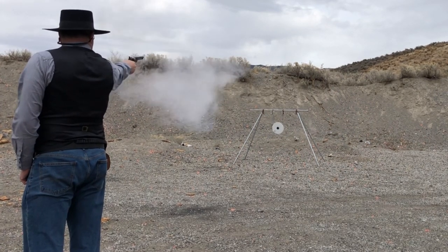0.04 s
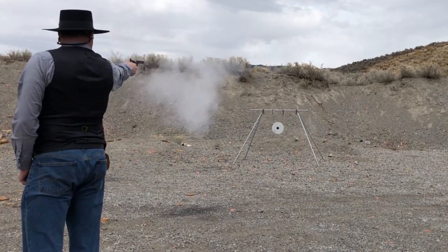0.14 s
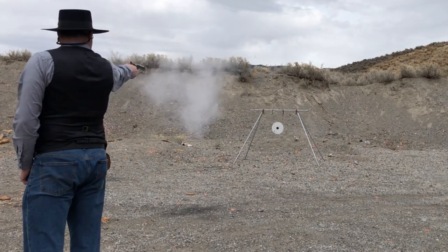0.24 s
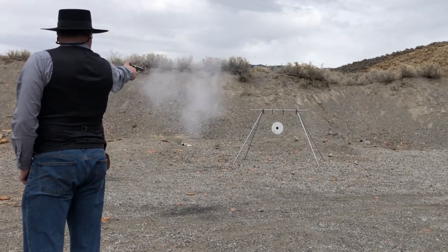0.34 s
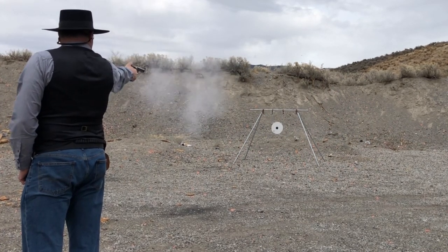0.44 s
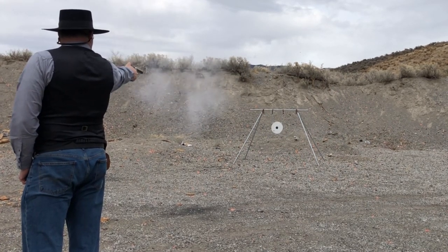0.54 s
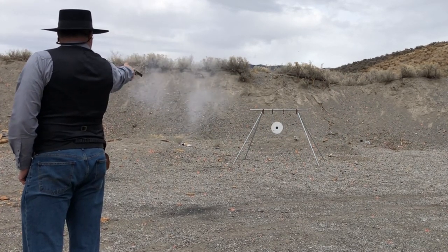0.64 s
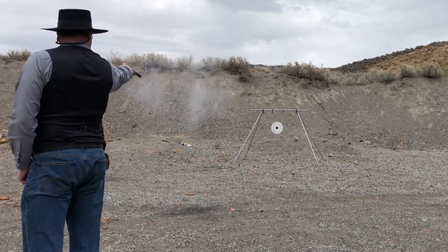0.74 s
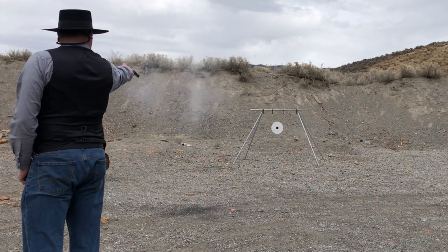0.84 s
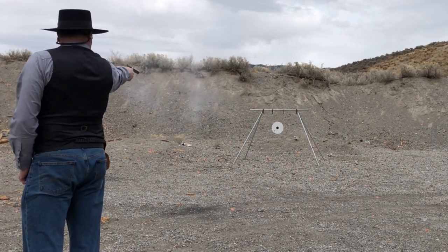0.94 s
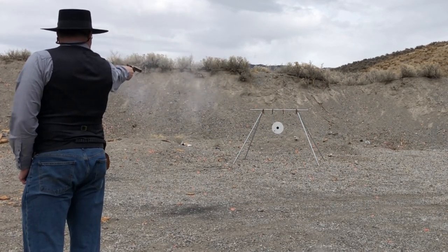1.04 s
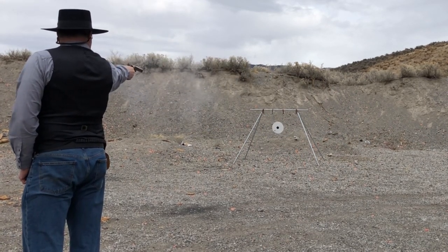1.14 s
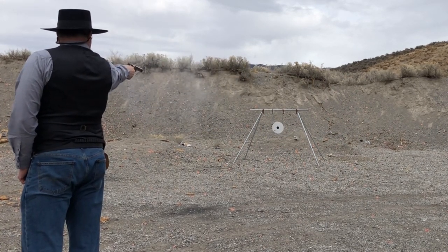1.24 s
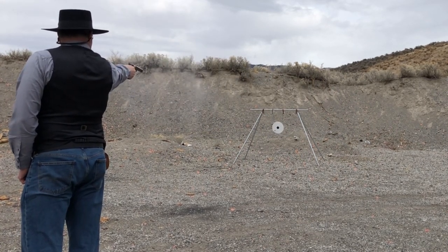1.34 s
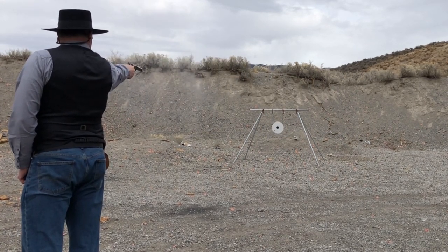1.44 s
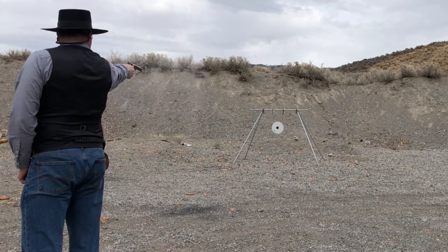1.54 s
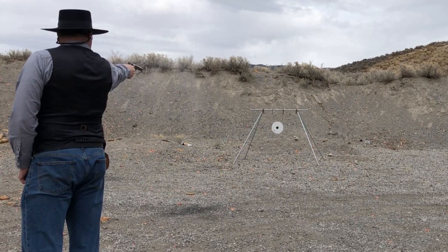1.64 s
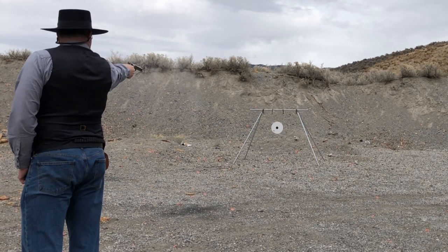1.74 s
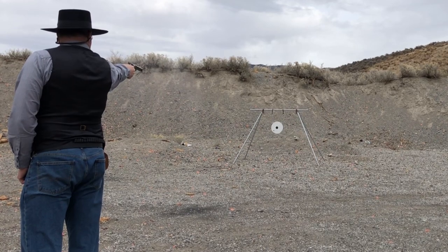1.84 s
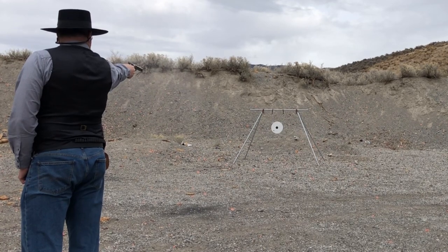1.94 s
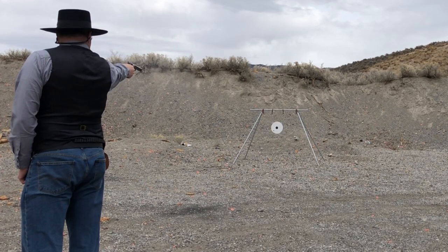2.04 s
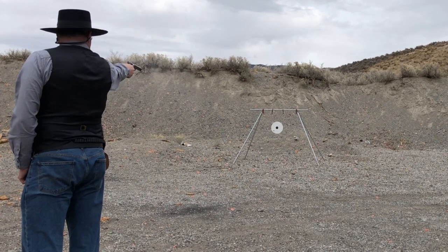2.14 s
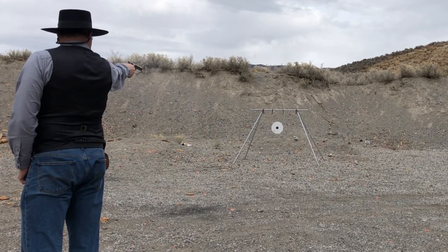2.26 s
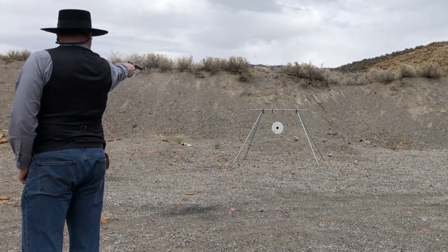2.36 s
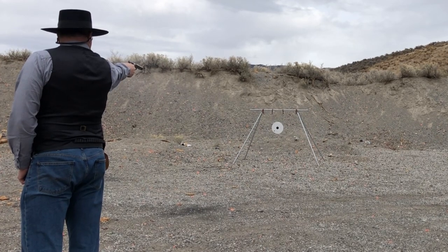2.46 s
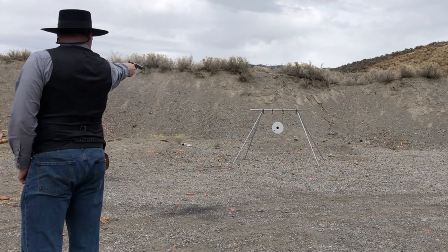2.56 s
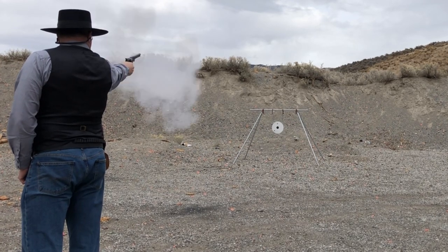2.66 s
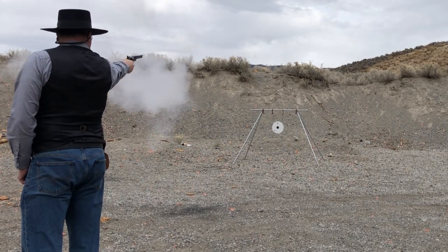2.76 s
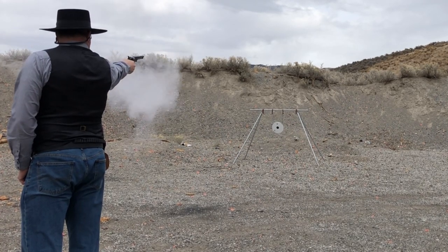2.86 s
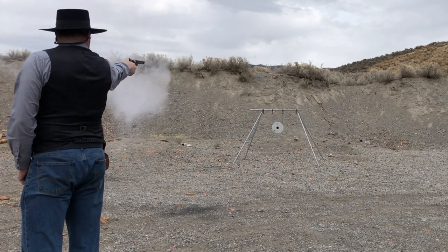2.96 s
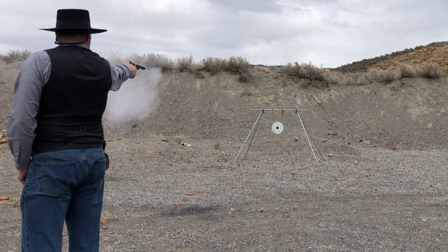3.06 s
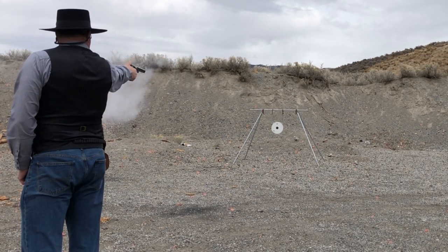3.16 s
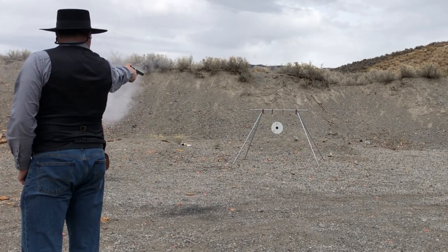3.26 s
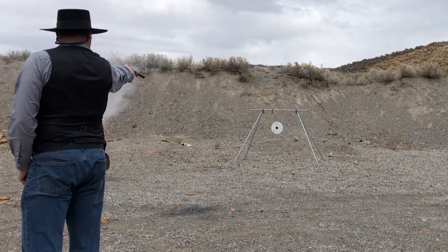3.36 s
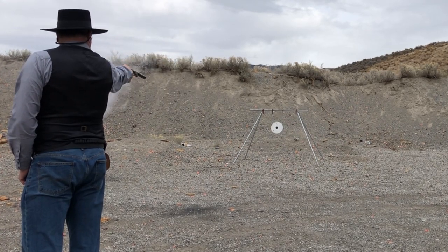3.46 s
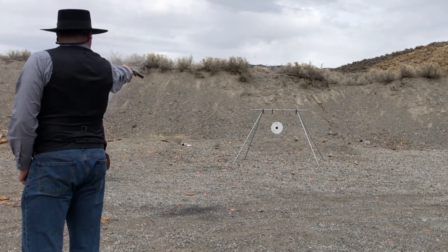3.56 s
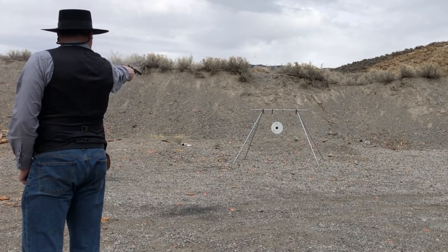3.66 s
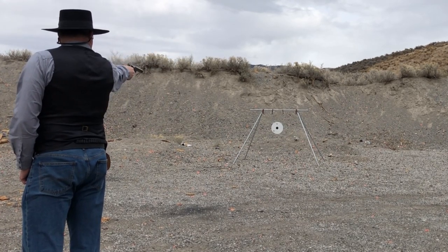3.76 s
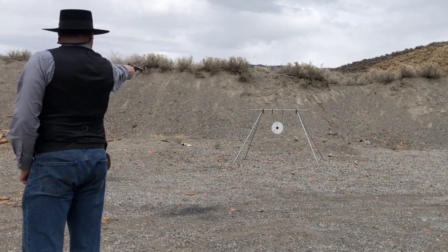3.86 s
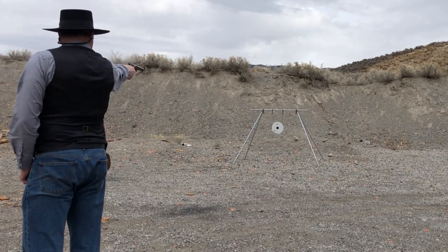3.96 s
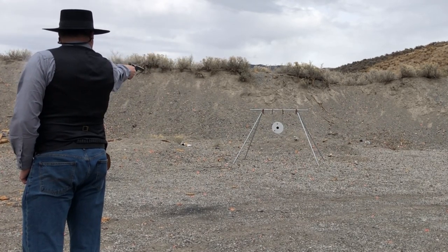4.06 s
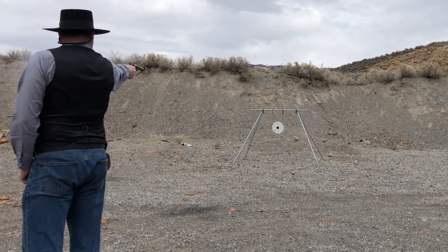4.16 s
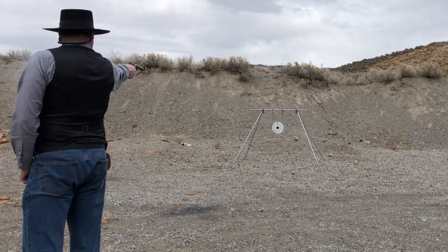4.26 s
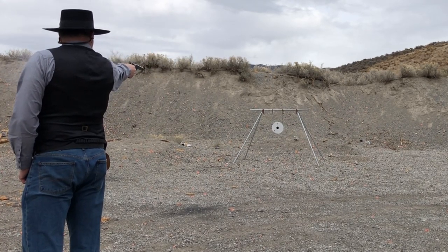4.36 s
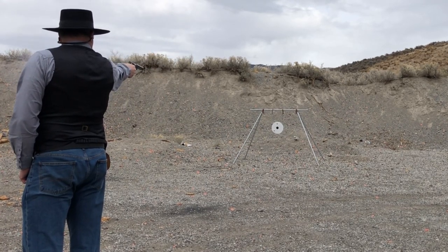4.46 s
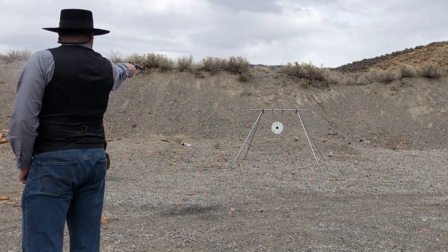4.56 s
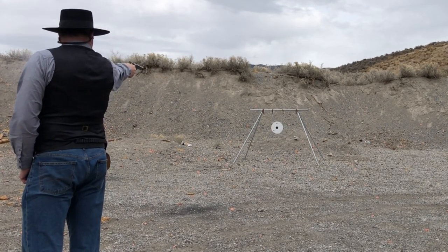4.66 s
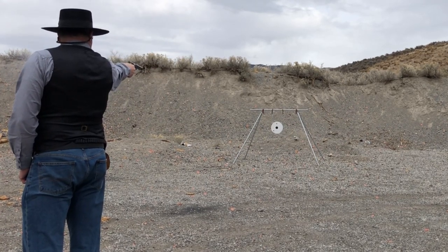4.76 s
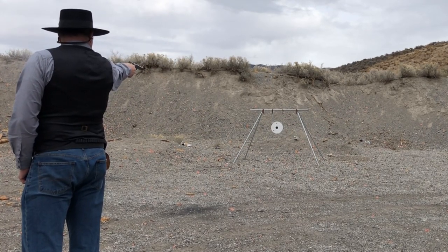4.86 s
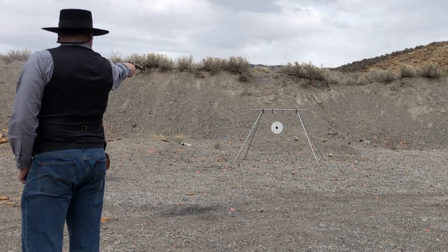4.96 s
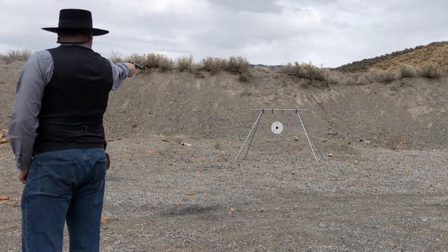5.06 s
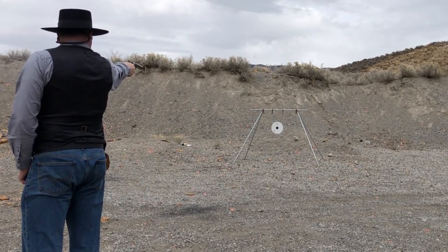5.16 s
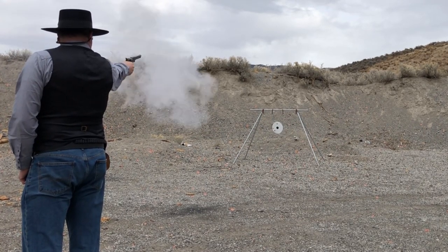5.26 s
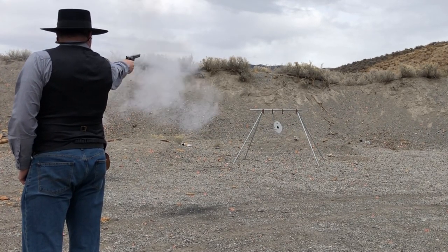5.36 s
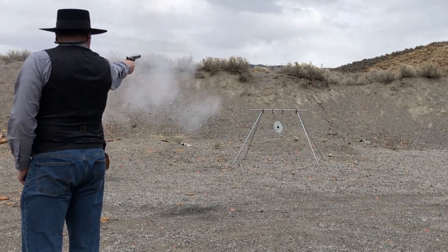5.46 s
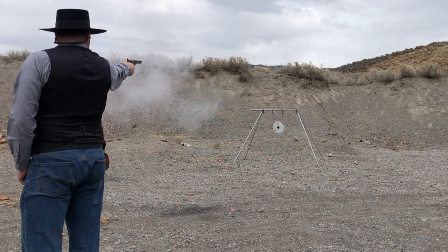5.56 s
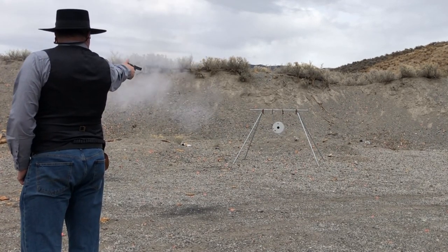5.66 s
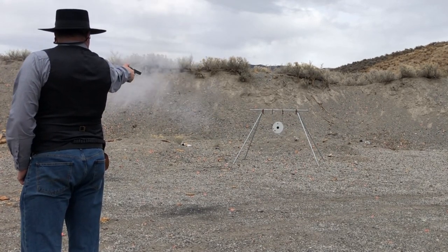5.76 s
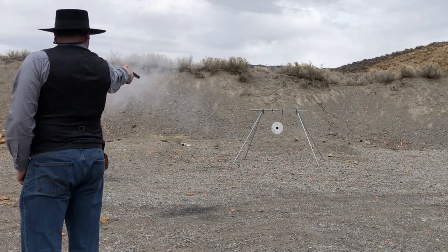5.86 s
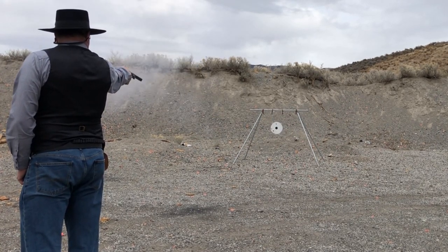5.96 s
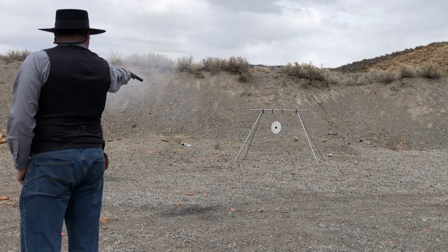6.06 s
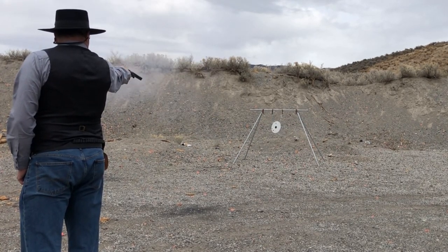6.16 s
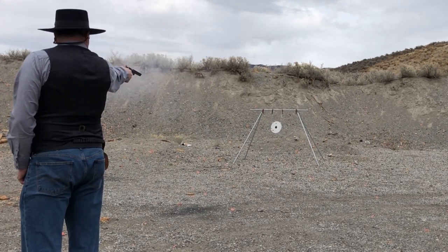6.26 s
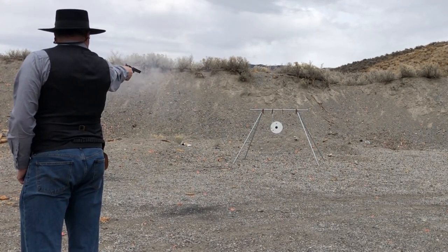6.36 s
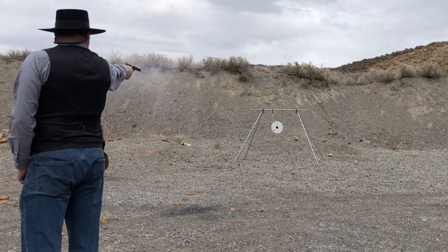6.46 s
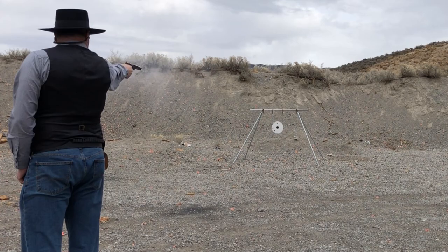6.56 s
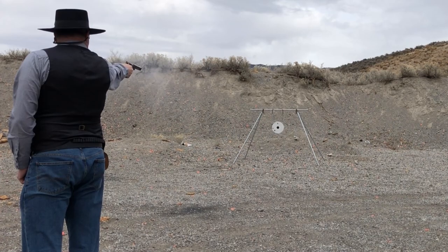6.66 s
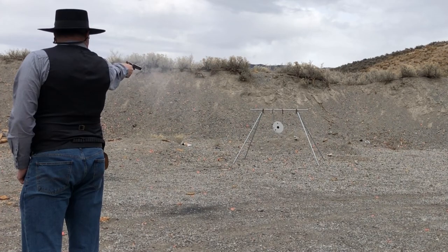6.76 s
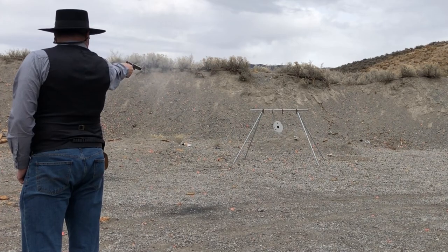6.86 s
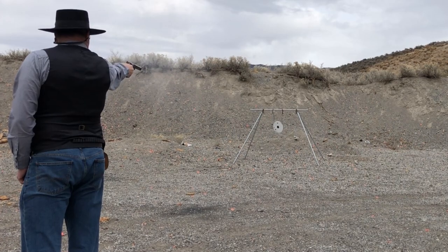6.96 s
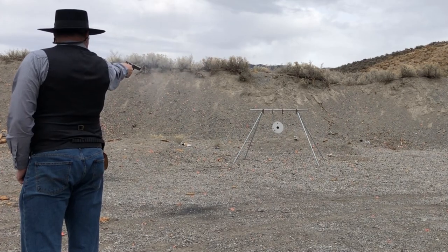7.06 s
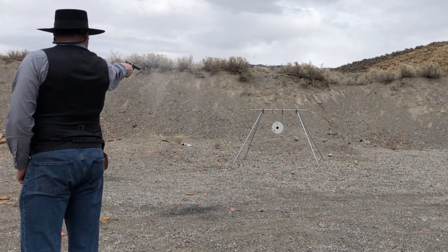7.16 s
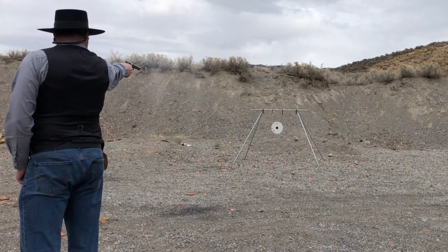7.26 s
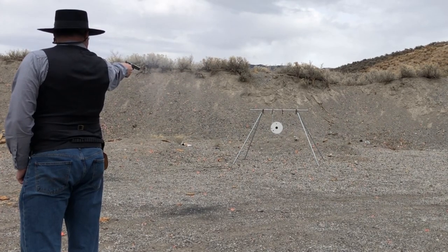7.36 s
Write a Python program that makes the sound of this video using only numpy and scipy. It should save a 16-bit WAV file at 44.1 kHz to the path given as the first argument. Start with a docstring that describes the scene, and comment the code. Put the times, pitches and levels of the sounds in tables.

```python
"""Revolver at a steel plate, windy desert range

Two black-powder shots at a hanging plate, after one fired just before the scene opens; the hammer clicks in between.
Each blast is a burst of noise that scatters off the ground and the berm, then rolls back from the hills.
The plate is a set of beating modes, which clang, ring and swing; a faint hiss is the open country.
Wind and muzzle gas push the microphone into overload, which chops every other sound while it lasts."""
import sys
import numpy as np
from scipy import signal
from scipy.fft import rfft, irfft
from scipy.io import wavfile

SR = 44100
rng = np.random.default_rng(int(sys.argv[2]) if len(sys.argv) > 2 else 0)


def store_pcm(level_fs):
    """Save levels as 16-bit WAV."""
    pcm = np.round(np.clip(level_fs, -1, 1) * 32767).astype(np.int16)
    wavfile.write(sys.argv[1], SR, np.atleast_2d(pcm).T)


N = 326781
TIME = np.arange(N) / SR  # s


def undb(db):
    """Decibels to gain."""
    return 10 ** (np.asarray(db) / 20)


def curve(rows, at, axis=1):
    """One column of a table, joined by straight lines."""
    rows = np.array(rows, float)
    return np.interp(at, rows[:, 0], rows[:, axis])


def fade(age, t60):
    """Sudden start and exponential decay, 60 dB in t60 seconds."""
    return (age >= 0) * np.exp(-np.log(1000) * np.maximum(age, 0) / t60)


def bell(age, spread_s):
    """Gaussian swell around age zero."""
    return np.exp(-.5 * (age / spread_s) ** 2)


def noise(colour, grain_db=0):
    """Random impulses of uneven size, coloured by a spectrum; rms 1."""
    hz, db = np.transpose(colour)
    impulses = rng.standard_normal(N) * undb(grain_db * rng.standard_normal(N))
    log_hz = np.log(np.fft.rfftfreq(N, 1 / SR) + 1e-9)
    gain = undb(np.interp(log_hz, np.log(hz), db))
    x = irfft(rfft(impulses) * gain, N)
    return x / x.std()


def pushes(rows):
    """Slow one-sided pressure swings with rounded flanks."""
    total = 0
    for s, length, size, flank in rows:
        rise = np.tanh((TIME - s) / flank)
        fall = np.tanh((TIME - s - length) / flank)
        total = total + size / 2 * (rise - fall)
    return total


# Shots on the range, the first just before the scene opens.
# Each row: time in seconds, relative level of blast and scatter in dB, relative level of the hill echo in dB.
SHOTS = [(-.268, 6, 0.5), (2.522, -0.5, -3.5), (5.109, -1.5, -3)]
# Spectra of the muzzle blast, of its scatter near the ground and of the roll from the distant hills.
# Each row: frequency in Hz, relative density in dB per Hz.
BLAST_COLOUR = [(40, 5.5), (150, -6.5), (1400, -2.5), (3500, -11), (8000, -14.5), (16000, -20)]
SCATTER_COLOUR = [(40, -7), (150, 5), (400, -4.5), (700, -6.5), (1400, -9.5), (2500, -10.5), (7000, -17),
                  (10000, -23.5), (16000, -33.5)]
HILLS_COLOUR = [(80, 7.5), (250, 7), (700, 1.5), (1500, -4), (2500, -7), (4500, -17), (7000, -26.5),
                (10000, -40), (16000, -54)]
# scatter from the gravel: close by it dies fast, farther off more slowly; the berm returns one broad swell
CLOSE_DB, CLOSE_T60_S, GROUND_DB, GROUND_T60_S = 0.5, 0.063, -1.5, .28
BERM_DB, BERM_DELAY_S, BERM_SPREAD_S = -23.5, 0.14, .026
# the roll from the hills swells, holds and dies away over a faint tail from farther ridges
HILLS_DB, HILLS_ATTACK_S, HILLS_HOLD_S, HILLS_T60_S = -39, .19, 0.25, 0.47
RIDGES_DB, RIDGES_T60_S = -16, 4.8  # dB relative to the roll


def near_scatter(age):
    """Strength of the dense echo: two decays from the gravel and a swell from the berm."""
    close = undb(CLOSE_DB) * fade(age, CLOSE_T60_S)
    ground = undb(GROUND_DB) * fade(age, GROUND_T60_S)
    berm = undb(BERM_DB) * bell(age - BERM_DELAY_S, BERM_SPREAD_S)
    return close + ground + berm


def hill_roll(age):
    """Strength of the far echo: many long paths make it swell, hold and trail off."""
    attack = np.clip(age / HILLS_ATTACK_S, 0, 1) ** 2
    release = fade(np.maximum(age - HILLS_ATTACK_S - HILLS_HOLD_S, 0), HILLS_T60_S)
    ridges = undb(RIDGES_DB) * fade(age, RIDGES_T60_S)
    return attack * (release + ridges)


def revolver(blast_db=13, blast_t60=0.068, grain_db=5, absorbed_hz=2800, treble_t60=1.2, treble_gain=10.0):
    """The blast, its dense scatter from gravel and berm, and the long roll from the hills."""
    blast = noise(BLAST_COLOUR)
    scatter = noise(SCATTER_COLOUR, grain_db)
    hills = noise(HILLS_COLOUR, grain_db)
    # slopes and bushes send back uneven patches of echo
    patches_db = 1.5 * noise([(5, 1), (40, 0.5), (120, -37.5), (500, -94)])
    hills = hills * undb(patches_db)
    dull = signal.sosfiltfilt(signal.butter(2, absorbed_hz, fs=SR, output="sos"), hills)
    treble = treble_gain * (hills - dull)
    out = 0
    for s, db, hills_db in SHOTS:
        age = TIME - s
        near = undb(blast_db) * fade(age, blast_t60) * blast + near_scatter(age) * scatter
        # the longer the path, the more treble the air takes away
        echo = dull + fade(age, treble_t60) * treble
        far = undb(HILLS_DB + hills_db) * hill_roll(age) * echo
        out = out + (age >= 0) * (undb(db) * near + far)
    return out


# Dull slaps of the blast off the ground and berm.
# Each row: time of the middle in seconds, frequency in Hz, Gaussian spread in seconds, level in dB.
SLAPS = [(2.568, 1102, 0.0033, -4), (2.572, 411.3, 0.0083, -6), (2.607, 321, 0.0022, -3),
         (2.658, 762, 0.0029, -13.5), (2.664, 262, 0.003, -15.5), (5.1168, 216.6, 0.0023, 10.5),
         (5.159, 427, 0.0053, -3), (5.171, 1930, 0.0026, -5.5)]


def slaps():
    """Single broad reflections, each a short sine pulse under a Gaussian swell."""
    out = 0
    for s, hz, spread_s, db in SLAPS:
        age = TIME - s
        out = out + undb(db) * bell(age, spread_s) * np.sin(2 * np.pi * hz * age)
    return out


# Blows on the hanging plate: two bullets, then one jerk against its hanger.
# Each row: time in seconds, splash level in dB, share of the free ring time,
# delay in seconds until the plate swings edge-on, seconds per half swing.
HITS = [(2.5852, 0, 0.92, 0.11, .46), (5.1726, 0.5, 1, 0.73, .81), (5.2138, -19, 0.092, .21, .41)]
# Modes of the plate; the point of contact decides how much each takes up.
# Each row: frequency in Hz, free ring time (t60) in seconds, beat with its twin in Hz,
# then level in dB for the first bullet, the second bullet and the hanger, before the swing.
PLATE_MODES = [(2097, 0.95, 0.14, -16, -20.5, -27.5), (3486, 0.23, 1.4, -2, -12.5, -30.5),
               (5390, 0.18, 6.3, -23.5, -22, -17.5), (7157, .2, 3.6, -17.5, -19, -23.5),
               (8120, 0.55, 15, -9, -29.5, -3), (11545, .45, 6, -24, -45, -35),
               (13400, 0.057, 7, -17, -25, -41), (13560, 0.091, 5, -21.5, -33.5, -32),
               (14200, .35, 3, -45, -28, -20), ]


def plate(splash_t60=0.05, twin=0.26, edge_on=0.3):
    """Lead splashes on the steel; paired modes beat, and fade whenever the swinging disc turns edge-on."""
    splash = noise([(200, 1), (1400, 3.5), (2500, -5.5), (6000, -11), (13000, -10), (16000, -18.0)])
    out = 0
    for k, (s, splash_db, free, edge_s, swing_s) in enumerate(HITS):
        age = TIME - s
        facing = np.hypot(np.sin(np.pi * (age - edge_s) / swing_s), edge_on)
        for hz, t60, beat_hz, *hit_dbs in PLATE_MODES:
            mode = np.sin(2 * np.pi * hz * age)
            twin_mode = twin * np.sin(2 * np.pi * (hz + beat_hz) * age)
            pair = (mode + twin_mode) / (1 + twin)
            out = out + undb(hit_dbs[k]) * fade(age, t60 * free) * facing * pair
        out = out + undb(splash_db) * fade(age, splash_t60) * splash
    return out


# Hammer and cylinder clicks of the revolver. Each row: time in seconds, level in dB, t60 in seconds.
CLICKS = [(0.5733, -35, 0.025), (0.7248, -39.5, 0.023), (3.2902, -49, 0.033), (3.334, -50, 0.033),
          (4.2009, -55.5, 0.016), (5.867, -46.5, 0.03), (5.904, -36, 0.033), (5.928, -43, 0.029)]
# Spectrum of the clicks. Each row: frequency in Hz, relative density in dB per Hz.
CLICK_COLOUR = [(800, -23), (2000, -13), (3000, -9), (4500, -8), (6500, -13), (11000, -17.5), (16000, -19)]


def hammer():
    """Short steel clicks as the hammer is drawn back and the cylinder locks: decaying noise."""
    clicks = sum(undb(db) * fade(TIME - s, t60) for s, db, t60 in CLICKS)
    return noise(CLICK_COLOUR) * clicks


# Muzzle gas shoving the microphone diaphragm.
# Each row: start in seconds, length in seconds, push in full scales before rounding, flank in seconds.
SURGES = [(2.531, 0.041, -1.05, 0.0036), (2.616, 0.04, -1.305, 0.013), (5.121, 0.052, 1.2, .003),
          (5.175, .017, -1.34, 0.0021), (5.192, 0.044, -0.97, 0.0018), (5.236, 0.047, -1.4, 0.008)]
# The heaviest eddies, which hit the microphone square on.
# Each row: start in seconds, length in seconds, push in full scales before rounding.
BUFFETS = [(-.03, .092, -1.7), (.096, .025, -1.7), (.152, .025, 1.7), (.235, .026, 1.88), (.322, .09, 2.3),
           (.52, .052, -2.56), (.585, .034, 2.33), (.632, .012, -2.6), (.727, .033, -2.2),
           (1.156, .0093, 2.42), (1.355, .02, 2.77), (1.449, .022, -2.6), (1.537, .007, -4.3),
           (1.78, .02, -2.5), (2.955, .049, 1.45), (3.034, .047, -1.55), (3.243, .025, 1.15),
           (4.48, .023, 2.3), (4.591, .015, 2.6), (6.435, .011, -2.2), (6.475, .023, -2.6),
           (6.588, .015, -2.3), (6.916, .033, -1.5), (6.964, .077, 2.1)]
# Wind at the microphone, in three successive stretches. Each row: time in seconds, strength in dB.
WIND = [
    [(0.03, -33.5), (0.05, -28), (0.91, -21), (1.07, -39.5), (1.13, -23), (1.78, -23), (2.13, -54.5),
     (2.2, -31.5), (2.5, -33.5)],
    [(2.8, -36.5), (3.5, -35), (3.8, -58), (4.04, -25), (4.19, -48.5), (4.46, -24.5), (4.76, -32.5),
     (4.8, -49.5), (5.08, -40.5)],
    [(5.4, -38), (5.768, -40), (5.956, -57), (6.088, -34.5), (6.414, -19), (6.9, -26), (6.966, -19.5),
     (6.998, -25.5), (7.38, -32)],
]
# Spectra of the large and of the small eddies. Each row: frequency in Hz, relative density in dB per Hz.
HEAVE_COLOUR = [(2, -10), (7, 8.5), (18, -2), (32, -11), (55, -27.5), (120, -66), (1500, -150)]
FLUTTER_COLOUR = [(20, -15.5), (42, -2.5), (70, -5), (120, -17.5), (250, -32.5), (500, -51), (1500, -72),
                  (8000, -125)]
GUST_DB = -21  # wind strength in a full gust
# eddies in a full gust, and the dB that they lose for each dB that the wind drops
HEAVE_DB, HEAVE_LAW = -2.5, .47
FLUTTER_DB, FLUTTER_LAW = -20, 1
BUFFET_FLANK_S = 0.0065


def wind(riding=0.33, smoothing=3):
    """Eddies, buffets and muzzle gas press on the microphone; small eddies grow faster with the wind than large ones."""
    strength_db = curve(np.vstack(WIND), TIME) - GUST_DB
    buffets = pushes([(*row, BUFFET_FLANK_S) for row in BUFFETS])
    shove = pushes(SURGES) + buffets
    eddies = noise(HEAVE_COLOUR)
    heave = undb(HEAVE_DB + HEAVE_LAW * strength_db) * eddies
    # small eddies come in bursts, riding on the large ones
    bursts = 1 - riding + riding * abs(eddies)
    flutter = undb(FLUTTER_DB + FLUTTER_LAW * strength_db) * noise(FLUTTER_COLOUR) * bursts
    turbulence = heave + flutter + lesser_buffets(undb(strength_db))
    # one strong shove sweeps the other eddies away
    return shove + turbulence / (1 + smoothing * shove ** 2)


def lesser_buffets(force, per_s=6, length_s=.018, push=2.1):
    """Short pushes of either sign, whose chance follows the force of the wind."""
    rows = []
    draws = rng.random(size=(120, 4))
    slot_s = N / SR / len(draws)
    for k, (when, chance, length, side) in enumerate(draws):
        s = (k + when) * slot_s
        gust = min(np.interp(s, TIME, force), 1)
        if chance < per_s * slot_s * gust ** 1.5:
            rows.append((s, length_s * (.5 + length), push * np.sign(side - .5), BUFFET_FLANK_S))
    return pushes(rows)


# Spectrum of the still desert air. Each row: frequency in Hz, relative density in dB per Hz.
AIR_COLOUR = [(100, -10.5), (400, -3.5), (700, -4.5), (1200, -3.5), (2000, -10), (4000, -23), (8000, -25.5),
              (16000, -28)]


def desert(air_db=-66):
    """The faint hiss of open country: steady coloured noise."""
    return undb(air_db) * noise(AIR_COLOUR)


def scene():
    """Pressure at the microphone."""
    return (revolver() + slaps() + plate() + hammer() + wind() + desert())[None]


def record(dry, rail=1.1, knee=40, coupling_hz=1.0, top_hz=15900):
    """The input stage saturates, its coupling capacitor lets flat tops sag, and the converter clips again."""
    x = dry / (1 + abs(dry / rail) ** knee) ** (1 / knee)
    x = signal.sosfilt(signal.butter(1, coupling_hz, "high", fs=SR, output="sos"), x)
    # short fades at both ends
    ends = np.tanh(np.minimum(TIME, TIME[::-1]) / .02) ** 2
    x = np.clip(x, -1, 1) * ends
    # nothing much passes above the top frequency
    return signal.sosfilt(signal.ellip(8, .2, 90, top_hz, fs=SR, output="sos"), x)


dry = scene()
out = record(dry)
store_pcm(out)
```